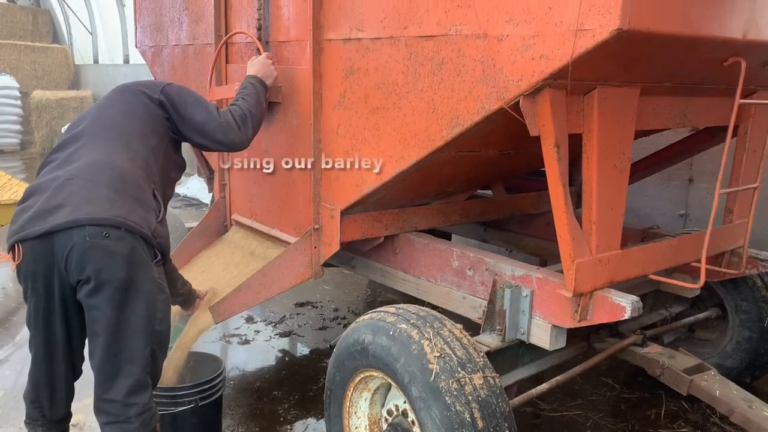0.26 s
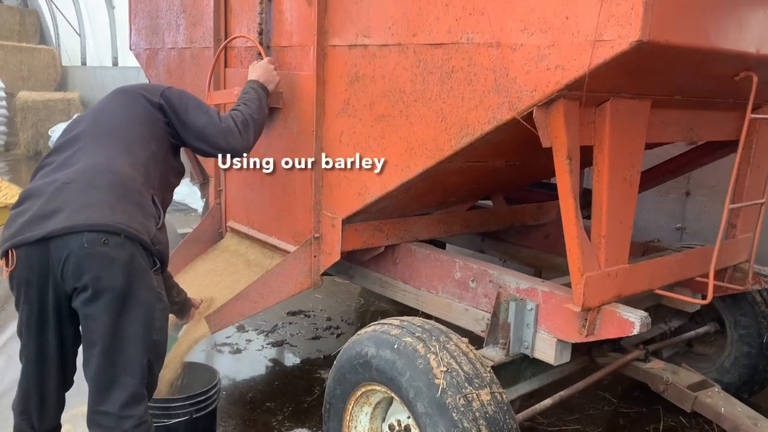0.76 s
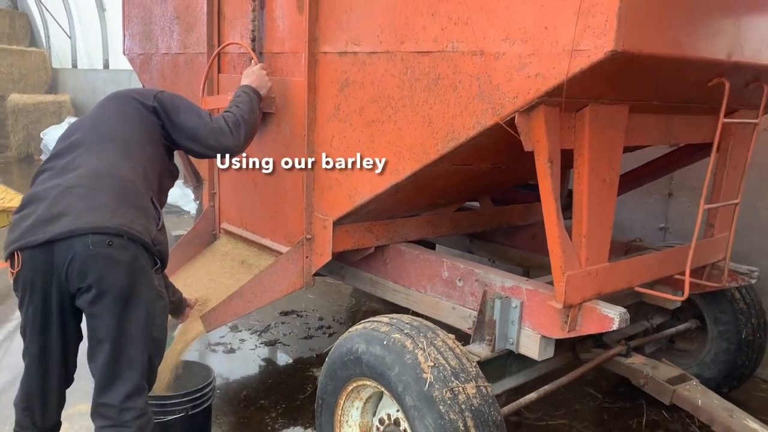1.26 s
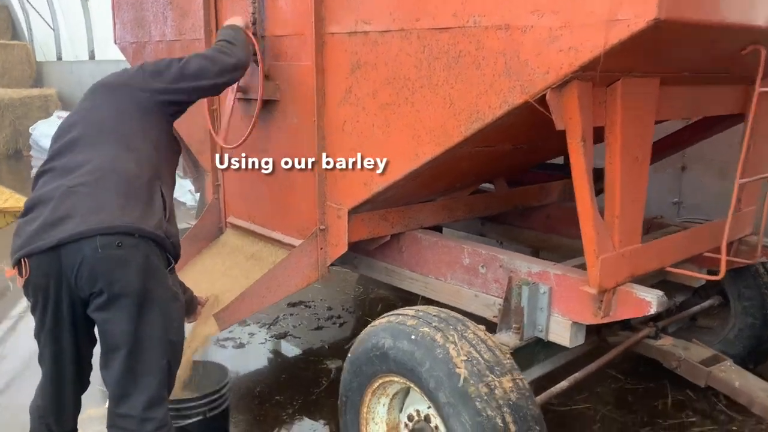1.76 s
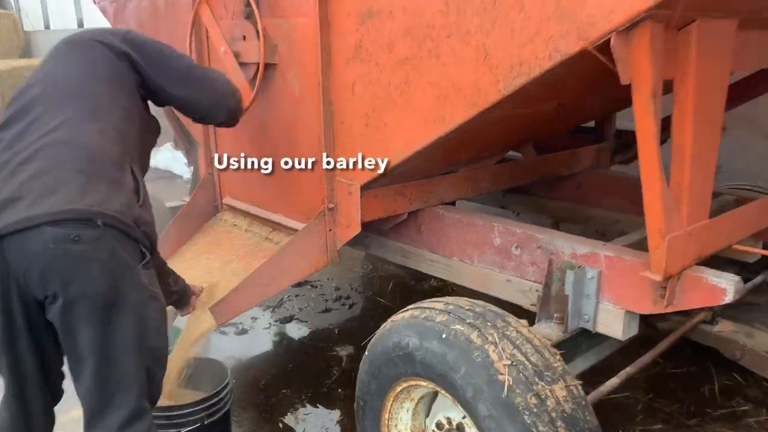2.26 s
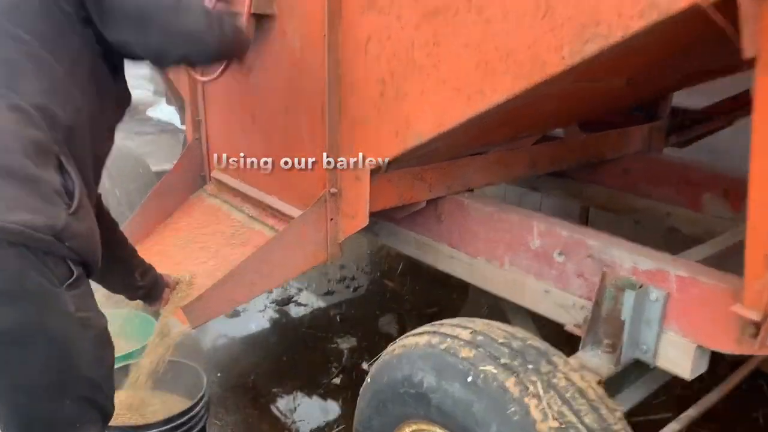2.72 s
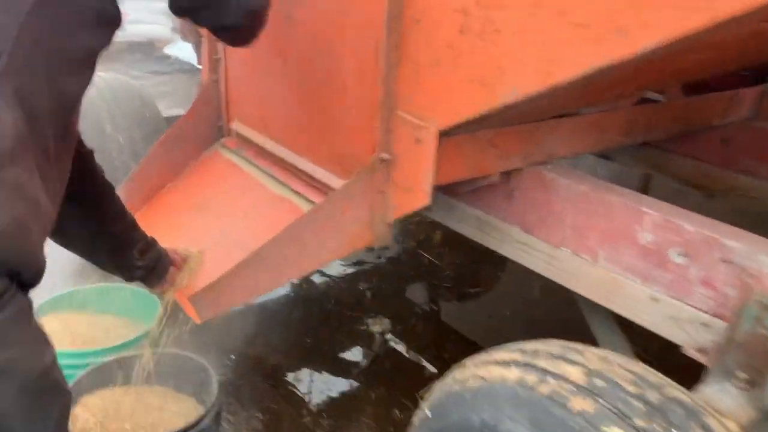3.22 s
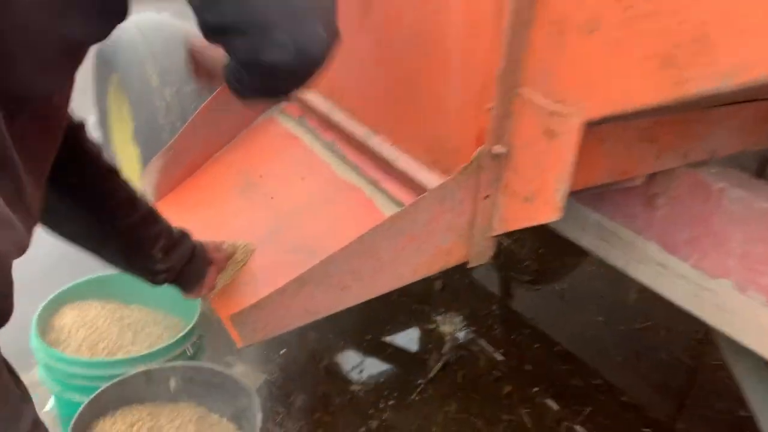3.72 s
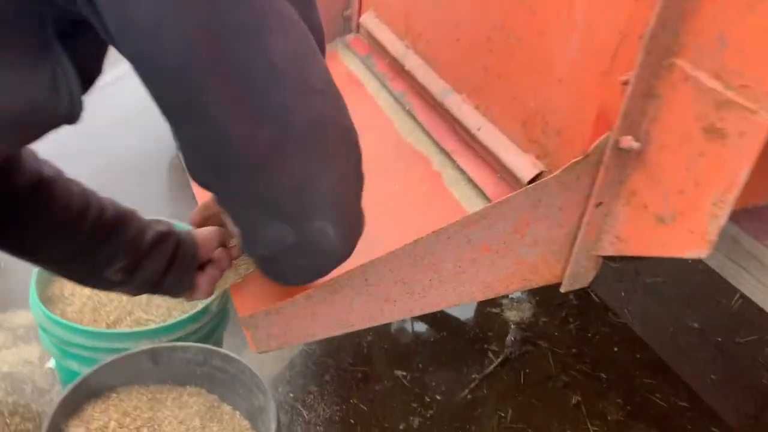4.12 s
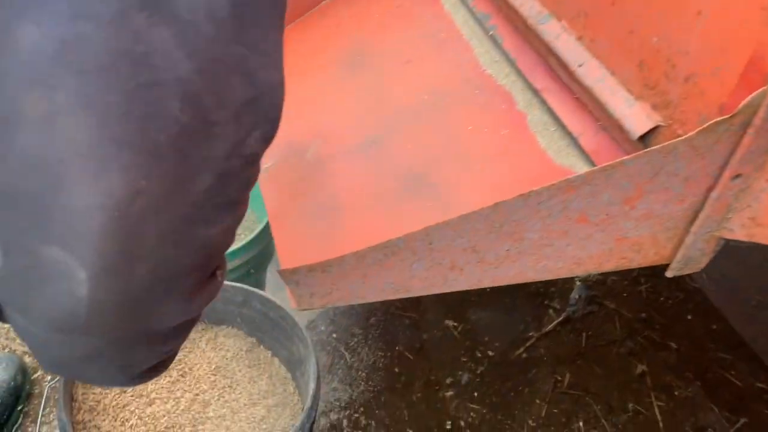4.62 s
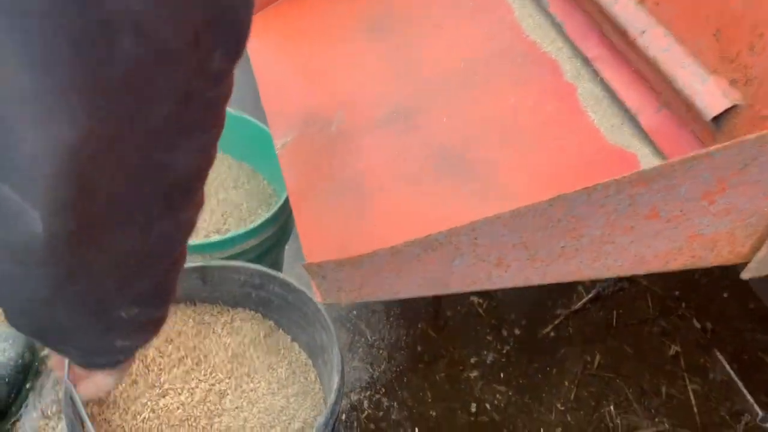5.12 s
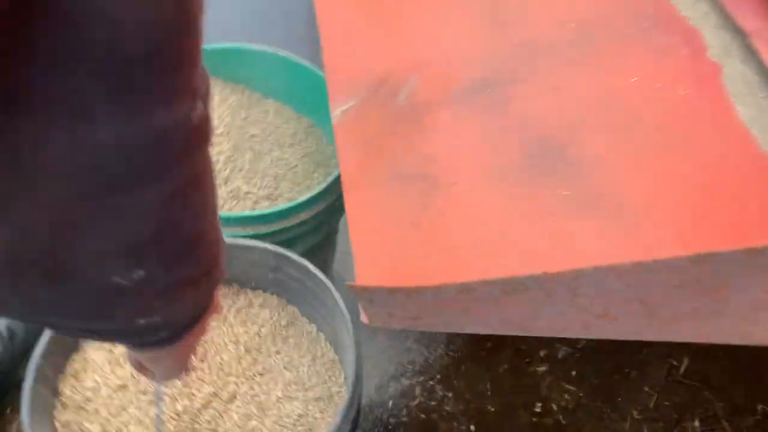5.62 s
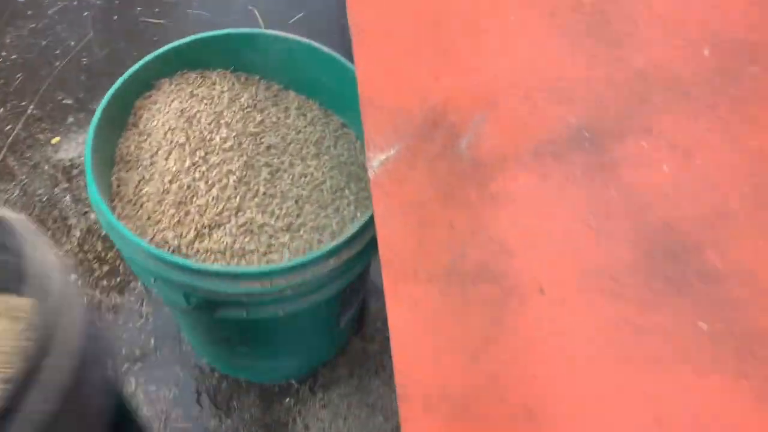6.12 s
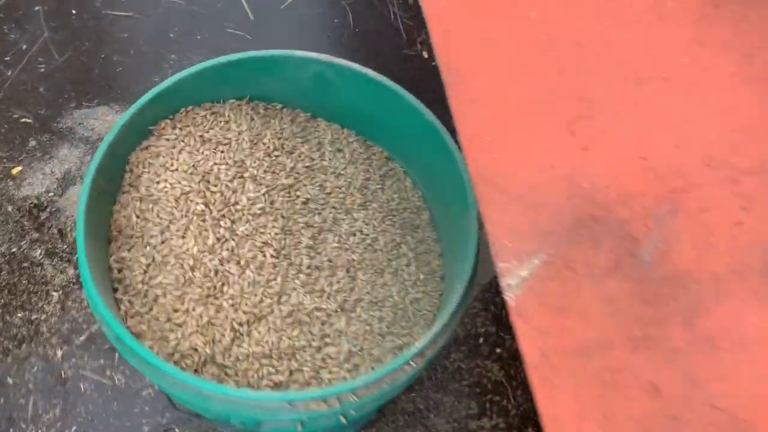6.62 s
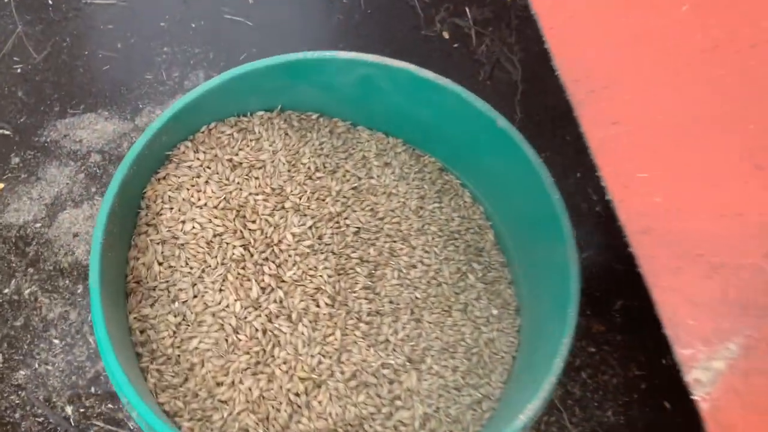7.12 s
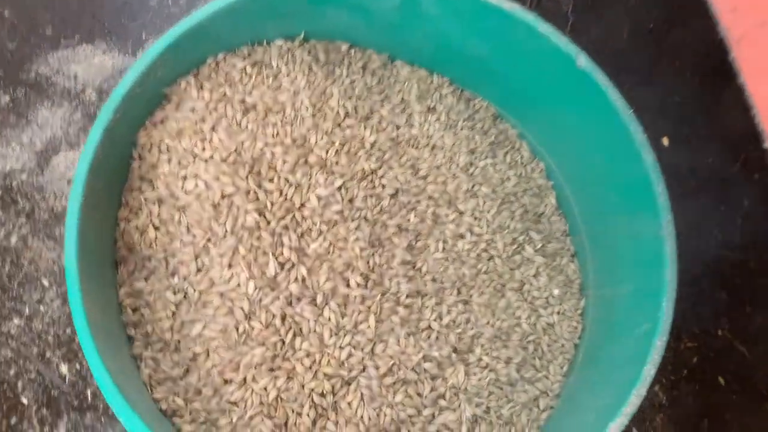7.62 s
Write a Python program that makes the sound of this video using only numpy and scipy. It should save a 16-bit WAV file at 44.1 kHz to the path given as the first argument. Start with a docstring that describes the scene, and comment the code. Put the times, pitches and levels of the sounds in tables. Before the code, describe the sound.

From 0 s a dense, unbroken stream of dry grain is already running: a bright hiss of husks sliding, a crisp fine rattle on steel and a duller patter on the heap in a plastic bucket. Tiny high swishes, each under a tenth of a second, brush through about three times a second, somewhat irregularly. Steel panels ring very faintly inside the noise. Below, a farm engine idles with a low, fast throb and a steady rotating hum. Around 2 s the pour swells slightly, then eases from 3 to 5 s while the engine grows closer, nearest around 5.4 s. At about 5.5 s one soft, short plastic knock sounds beside a strong swish. Around 6 s the hiss and patter brighten again with strong swishes. After 7 s the grain thins slightly and a hollow low drone wavers more clearly, continuing to the cut at 7.9 s. Open air, close stereo, no reverberation.

```python
"""Grain chute and farm engine

Dry grain streams down a chute into a plastic bucket: dense random clicks, coloured per kind of contact.
A bright swish, band-passed ticks, returns about three times a second, likely an auger flight shoving grain.
A farm engine idles nearby: tones of its firing rate, gated noise puffs, a faster shaft and a hollow drone.
The steel panels ring faintly and the bucket knocks once, both as decaying modes. Two close microphones."""
import sys
import numpy as np
from scipy import signal
from scipy.fft import rfft, irfft, next_fast_len
from scipy.io import wavfile
from scipy.ndimage import uniform_filter1d

SR = 44100
rng = np.random.default_rng(int(sys.argv[2]) if len(sys.argv) > 2 else 0)


def store_pcm(level_fs):
    """Save levels as 16-bit WAV."""
    pcm = np.round(np.clip(level_fs, -1, 1) * 32767).astype(np.int16)
    wavfile.write(sys.argv[1], SR, np.atleast_2d(pcm).T)


N = 347067
FFT_SIZE = next_fast_len(N, True)
TIME_S = np.arange(N) / SR
FREQ_HZ = np.fft.rfftfreq(FFT_SIZE, 1 / SR)

# kernels pattering on the heap: (time [s], level [dB])
PATTER_LEVEL = [(0, -40), (1.6, -40.5), (2.05, -38.5), (2.45, -39.5), (3.6, -40.5), (4.3, -40),
                (5.2, -40.5), (5.7, -41), (6.3, -38.5), (7, -40), (7.87, -40.5)]


def amp(db):
    """Decibels to gain."""
    return 10 ** (np.asarray(db) / 20)


def evened(x):
    """Scales to rms 1."""
    return x / np.sqrt(np.mean(x ** 2) + 1e-20)


def curves(rows):
    """Each column of a table, joined by straight lines in time."""
    s, *columns = np.transpose(rows)
    return [np.interp(TIME_S, s, column) for column in columns]


def across(points):
    """A table of (frequency [Hz], value) read at every FFT bin, linear in log frequency."""
    hz, value = np.transpose(points)
    return np.interp(np.log(FREQ_HZ + 1), np.log(hz + 1), value)


def drift(per_s):
    """Random curve of rms 1: straight lines between per_s new values a second."""
    knots = rng.standard_normal(4096)
    return evened(np.interp(TIME_S * per_s, np.arange(len(knots)), knots))


def impacts(per_s, spread_db):
    """Two unrelated showers of kernel clicks, random in time, sign and size; sizes are exponential in dB."""
    size = amp(spread_db * np.minimum(rng.exponential(1, (2, N)), 4))
    sign = rng.choice([-1, 1], (2, N))
    hit = rng.random((2, N)) < per_s / SR
    return evened(size * sign * hit)


def patchy(drive, patchy_db):
    """Random gain patches over time and frequency, a few hundredths of a second long, roughen the noise."""
    spectra = signal.stft(drive, nperseg=1024)[2]
    patches = rng.standard_normal(spectra.shape[1:])
    for axis in (0, 1):  # frequency, then time
        patches = uniform_filter1d(patches, size=4, axis=axis)
    roughened = spectra * amp(patchy_db * evened(patches))
    return evened(signal.istft(roughened, nperseg=1024)[1][:, :N])


def pair(drive, colour, right_db=0):
    """Colours two drives and mixes them into two microphones, partly alike; sound reaches the left first."""
    # likeness of the two sides: (frequency [Hz], likeness [0-1])
    likeness = [(130, 1), (250, .96), (500, .77), (1000, .33), (1700, .55), (2600, .28), (3700, .72),
                (4100, .8), (4350, .9998), (16000, .9998)]
    # right-side phase lag beyond the plain delay: (frequency [Hz], lag [rad])
    extra_lag = [(100, -.2), (170, -.4), (500, -1.3), (1000, -2.3), (2400, -2.3), (3500, -3.8), (5000, -4),
                 (16000, -4.08)]
    delay_s = .00024
    direct, scattered = rfft(drive, FFT_SIZE) * evened(amp(across(colour)))
    same = np.clip(across(likeness), 0, 1)
    lag = np.exp(-1j * (2 * np.pi * FREQ_HZ * delay_s + across(extra_lag)))
    right = lag * (same * direct + np.sqrt(1 - same ** 2) * scattered)
    sides = irfft(np.array([direct, right]), FFT_SIZE)[:, :N]
    return sides * amp([[-right_db / 2], [right_db / 2]])


def tones(turns, orders, waver_db, per_s, smear_rad=0):
    """Multiples of one rotation, each wavering alone; the path to the listener smears their timing."""
    total = 0
    for k, db in orders:
        level = amp(db + waver_db * drift(per_s))
        total = total + level * np.cos(2 * np.pi * k * turns - smear_rad * k ** 2)
    return np.sqrt(2) * total  # makes the levels rms


def placed(orders):
    """Tone levels as the listener walks up to the chute, then leans over the buckets."""
    # the two walks: (start [s], end [s])
    walks = [(1.8, 2.9), (5.5, 7.2)]
    return [(k, np.interp(TIME_S, np.ravel(walks), [back, chute, chute, over]))
            for k, back, chute, over in orders]


def shaft():
    """A faster rotor drones beside the engine; near tones beat slowly, colour shifts with the listener's place."""
    # (multiple of the rate, further back [dB], beside the chute [dB], over the buckets [dB])
    shaft_tones = [(2, -52, -51.5, -47.5), (3, -63, -49.5, -49), (4, -52.5, -53, -58), (5, -62, -63, -51),
                   (6, -58.5, -53, -71), (8, -75, -65, -54)]
    mean_hz = 46.22
    turns = np.cumsum(mean_hz * (1 + 0.0025 * drift(per_s=5))) / SR
    return tones(turns, placed(shaft_tones), waver_db=1.7, per_s=5, smear_rad=0.6916)


def engine(puff_turns=0.98, between=0.95, uneven=0.051):
    """Each firing gives a low pulse and a puff of exhaust noise; alternate puffs differ in strength."""
    # machinery level by the listener's distance: (time [s], level re closest [dB])
    nearness = [(0, -8.5), (2, -7), (3.4, -5), (5.4, 0), (7.87, -3)]
    # orders swelling and fading with place: (time [s], order 2 [dB], order 3 [dB], order 4 [dB])
    hum_levels = [(0, -47, -40.5, -48), (2.2, -45, -41.5, -46.5), (2.55, -49, -44.5, -45.5),
                  (3.15, -56, -43, -52), (3.9, -47, -41.5, -61), (5.1, -49, -52.5, -44),
                  (5.55, -47, -65, -55), (6.15, -40.5, -45, -49), (6.55, -42, -44, -53),
                  (7.15, -45, -44, -57), (7.87, -41, -43.5, -56)]
    # weaker tones: (multiple of the rate, further back [dB], beside the chute [dB], over the buckets [dB])
    overtones = [(1.5, -60, -60, -55), (3.5, -70, -62, -60), (4.5, -63, -60, -63), (5, -53, -56.5, -55),
                 (5.5, -55.5, -55, -63), (7, -58.5, -59.5, -61), (9, -64.5, -69, -69),
                 (9.5, -56.5, -58.5, -80)]
    # exhaust colour: (frequency [Hz], relative density [dB per Hz])
    puff_colour = [(28, -52), (45, -29), (60, -4), (90, -1.5), (140, 2), (220, -2), (300, -10.5),
                   (450, -16.5), (900, -24.5)]
    firing_hz = 37.42
    closest_puff_db, closest_fundamental_db = -40, -47.5
    near_db, = curves(nearness)

    turns = np.cumsum(firing_hz * (1 + 0.0018 * drift(per_s=12))) / SR
    orders_db = [closest_fundamental_db + near_db, *curves(hum_levels)]
    hum = tones(turns, enumerate(orders_db, 1), waver_db=.3, per_s=16, smear_rad=.25)
    # unequal cylinders add half orders
    hum = hum + tones(turns, placed(overtones), waver_db=1.3, per_s=7, smear_rad=.9)

    gate = between + np.exp(-(turns % 1) / puff_turns)
    gate = gate * (1 + uneven * np.cos(np.pi * turns))
    puffs = rng.standard_normal((2, N)) * evened(gate) * amp(closest_puff_db + near_db)
    return hum + pair(puffs, puff_colour)


def drone():
    """A narrow, hollow strand of noise wavers above the engine's hum, strongest over the buckets."""
    # colour: (frequency [Hz], relative density [dB per Hz])
    drone_colour = [(140, -45), (195, -19), (212, -5), (227, 5.5), (240, -5), (268, -8), (295, -25),
                    (500, -61)]
    # (time [s], level [dB])
    drone_level = [(0, -54), (1.6, -59.5), (2.1, -51), (2.8, -53), (3.7, -52.5), (4.5, -49.5), (5.6, -51),
                   (6.4, -50.5), (6.7, -59), (7.15, -45.5), (7.4, -49), (7.6, -45.5), (7.87, -44)]
    level_db, = curves(drone_level)
    return pair(rng.standard_normal((2, N)) * amp(level_db), drone_colour)


def bucket(rise_s=0.0015):
    """A soft knock rings the plastic wall's modes, which the grain damps at once."""
    # (time [s], level [dB])
    knocks = [(5.4755, -26.5)]
    # wall modes: (frequency [Hz], relative level [dB], t60 [s])
    wall_modes = [(1024, -6, .04), (1320, -1.5, 0.046), (1670, 3, 0.037)]
    out = np.zeros(N)
    for s, level_db in knocks:
        t = np.clip(TIME_S - s, 0, 1)
        ring = sum(amp(db - 60 * t / t60) * np.sin(2 * np.pi * hz * t) for hz, db, t60 in wall_modes)
        out += amp(level_db) * (1 - np.exp(-t / rise_s)) * ring
    return out


def steel():
    """The stream keeps the chute's panels ringing; each mode swells and fades as kernels land elsewhere."""
    # panel modes: (frequency [Hz], level re patter [dB], t60 [s])
    panels = [(364, -26.5, 0.11), (446, -29, 0.22), (502.5, -27, .12), (779, -32, 0.15), (1043, -25, 0.094),
              (1307, -26, 0.12), (1428, -29, 0.078), (1830, -28.5, 0.12), (2078, -33, 0.087)]
    # colour: (frequency [Hz], relative gain [dB])
    steel_colour = [(200, -20), (330, 0), (2200, 0), (4000, -20)]
    wander_db = 2.5
    t = TIME_S[:SR // 4]
    out = np.zeros((2, N))
    kernels = impacts(per_s=3000, spread_db=2)
    for hz, db, t60 in panels:
        ring = amp(-60 * t / t60) * np.cos(2 * np.pi * hz * t)
        struck = signal.oaconvolve(kernels, ring[None], axes=1)[:, :N]
        out += evened(struck) * amp(db + wander_db * drift(per_s=3))
    patter_db, = curves(PATTER_LEVEL)
    return pair(out * amp(patter_db), steel_colour)


def swishes():
    """Each shove slides kernels over steel: a brief, soft-edged swell of ticks in a band of its own."""
    # strong ones about .3 s apart: (time [s], level before colouring [dB], band centre [Hz])
    shoves = [(.073, -44, 8800), (.215, -38, 12000), (.287, -33.5, 8500), (.38, -37, 10000),
              (.54, -39, 12000), (.848, -39, 11500), (.99, -37, 9000), (1.283, -39, 9000),
              (1.46, -41, 9500), (1.576, -38, 9500), (1.75, -40, 13500), (1.892, -35, 9300),
              (2.197, -39.5, 9700), (2.496, -38, 10000), (2.807, -40, 9000), (2.96, -42, 10500),
              (3.111, -42, 9200), (3.19, -42, 14500), (3.26, -40, 9000), (3.399, -36, 8800),
              (3.57, -39, 9000), (3.695, -42, 9000), (3.87, -38, 9500), (3.994, -38, 9800),
              (4.299, -45, 9800), (4.612, -39, 9400), (4.923, -35.5, 9800), (5.23, -37, 9600),
              (5.523, -34, 9300), (5.56, -37, 13500), (5.825, -34, 9600), (5.89, -39, 14000),
              (6.116, -33.5, 10000), (6.27, -42, 9300), (6.423, -36, 11000), (6.568, -38, 9000),
              (6.725, -38, 10000), (7.036, -45, 10000), (7.648, -38, 10500)]
    # colour: (frequency [Hz], relative gain [dB])
    swish_colour = [(3000, -10), (7400, -6), (8100, 0), (16000, -1)]
    width_s, band_hz = 0.017, 3200  # width: standard deviation of the swell's power
    ticks = impacts(per_s=18000, spread_db=-5.5)  # negative: mostly large, a few small
    out = np.zeros((2, N))
    for s, level_db, hz in shoves:
        near = slice(*np.searchsorted(TIME_S, [s - .1, s + .1]))
        band = signal.butter(2, [hz - band_hz / 2, hz + band_hz / 2], "bandpass", fs=SR)
        swell = amp(level_db) * np.exp(-((TIME_S[near] - s) / (2 * width_s)) ** 2)
        out[:, near] += swell * evened(signal.lfilter(*band, ticks[:, near]))
    return pair(out, swish_colour)


def stream():
    """Kernels drum on the bucket, patter on the heap, rattle on the steel and slide over each other."""
    # strength of the stream; its swing about the mean drives the rattle: (time [s], level [dB])
    flow = [(0, -40.5), (1.25, -40), (1.5, -39.5), (2.15, -38.5), (2.7, -39.5), (3.4, -41.5), (4.0, -40.5),
            (4.5, -41), (4.8, -42), (5.7, -43), (6.25, -39.5), (7.1, -40), (7.5, -41.5), (7.87, -41.5)]
    # low drumming under the patter: (time [s], level [dB])
    drum_level = [(0, -46.5), (0.75, -52), (1.1, -47.5), (2.0, -47.5), (2.9, -51), (3.3, -46), (3.8, -60),
                  (4.5, -55), (4.9, -46.5), (5.6, -57), (6.3, -51), (7.87, -57)]
    # husks sliding over each other: (time [s], level [dB])
    husk_level = [(0, -31.5), (1.4, -31.5), (2.1, -30.5), (3.5, -32), (4.5, -33), (5.4, -33), (5.75, -31),
                  (6.1, -30), (6.5, -31), (7.1, -32.5), (7.87, -34)]
    # colour of each kind of contact: (frequency [Hz], relative density [dB per Hz])
    drum_colour = [(150, -21), (280, -10), (350, -6), (420, -11), (700, -25), (2000, -70)]
    patter_colour = [(150, -27), (330, -10), (500, -2), (750, -3), (1050, -1.5), (1500, -3), (2200, -9),
                     (4000, -73)]
    rattle_colour = [(900, -22), (1500, -10), (2200, -2.6), (3200, -1), (4400, -1.3), (5400, -.2),
                     (6500, .2), (7500, -1.2), (9000, -12), (13000, -28)]
    hiss_colour = [(5000, -26), (7000, -12.5), (7450, -10.5), (8000, -1.3), (8600, 0), (9600, -1.5),
                   (10700, -2.3), (12500, -4), (16000, -6)]
    chute_db = -34.5  # at mean flow
    flow_db, = curves(flow)
    drum_db, = curves(drum_level)
    patter_db, = curves(PATTER_LEVEL)
    husk_db, = curves(husk_level)
    surge_db = flow_db - flow_db.mean()
    clumps_db = .25 * drift(per_s=70)

    drum = impacts(per_s=5000, spread_db=2) * amp(drum_db)
    patter = patchy(impacts(per_s=14000, spread_db=2), patchy_db=1.8)
    patter *= amp(patter_db + .4 * drift(per_s=18))
    rattle = patchy(impacts(per_s=18000, spread_db=2.2), patchy_db=2.3)
    rattle *= amp(chute_db + surge_db + clumps_db + .35 * drift(per_s=18))
    hiss = patchy(impacts(per_s=18000, spread_db=2.7), patchy_db=2)
    hiss *= amp(husk_db + clumps_db + .5 * drift(per_s=24))

    low = pair(drum, drum_colour) + pair(patter, patter_colour, right_db=1.5)
    return low + pair(rattle, rattle_colour) + pair(hiss, hiss_colour)


def scene():
    """Grain and machinery in the open air."""
    return shaft() + engine() + drone() + bucket() + steel() + swishes() + stream()


def record(dry):
    """The recorder's band limit: a steep low-pass."""
    edge_hz = 15750
    lowpass = signal.firwin(1023, edge_hz, window=("kaiser", 9), fs=SR)
    return signal.oaconvolve(dry, lowpass[None], "same")


dry = scene()
out = record(dry)
store_pcm(out)
```